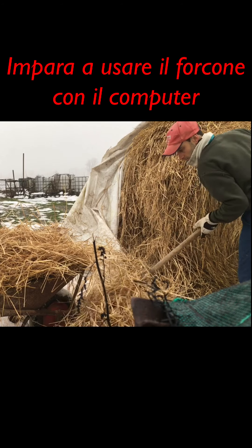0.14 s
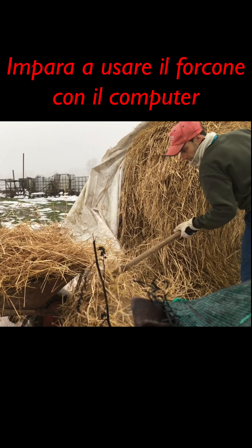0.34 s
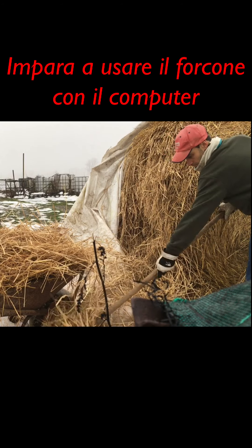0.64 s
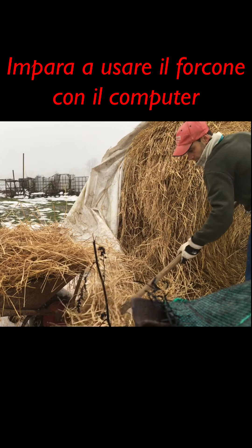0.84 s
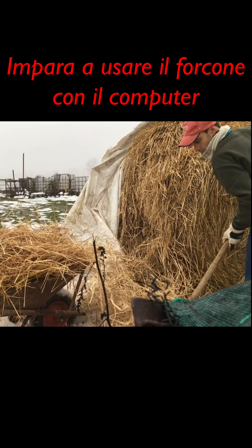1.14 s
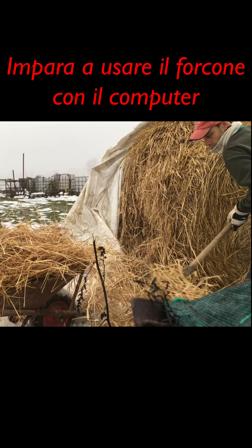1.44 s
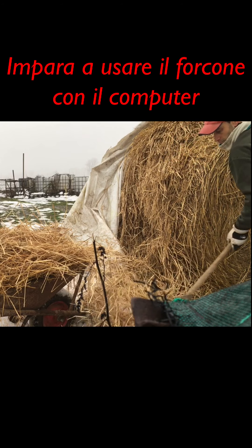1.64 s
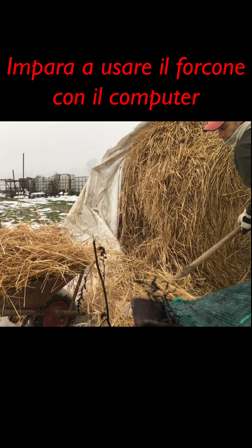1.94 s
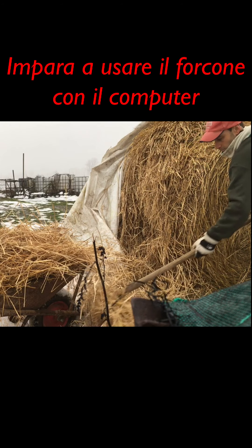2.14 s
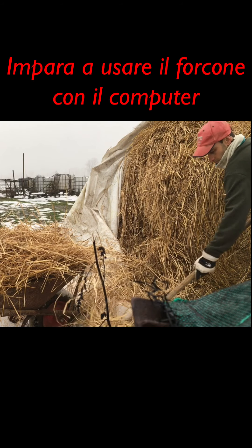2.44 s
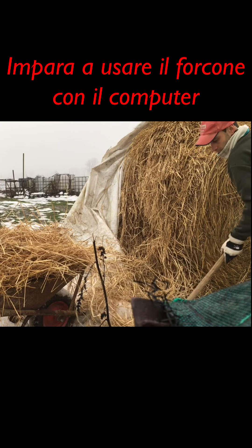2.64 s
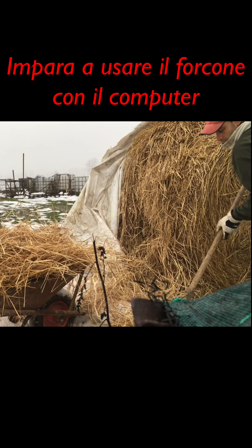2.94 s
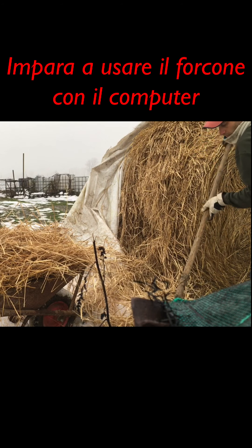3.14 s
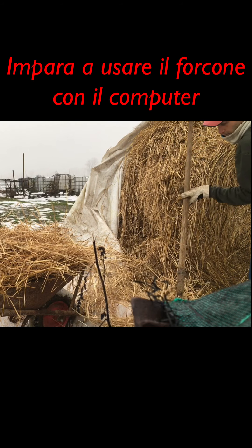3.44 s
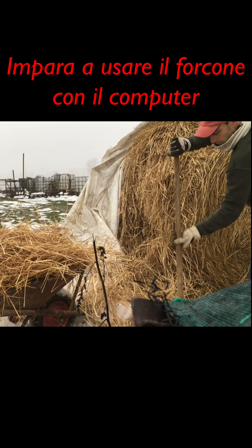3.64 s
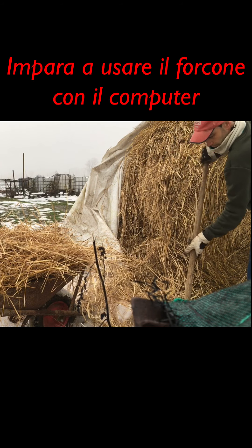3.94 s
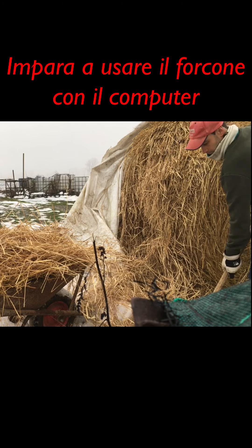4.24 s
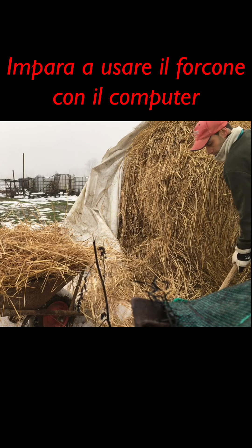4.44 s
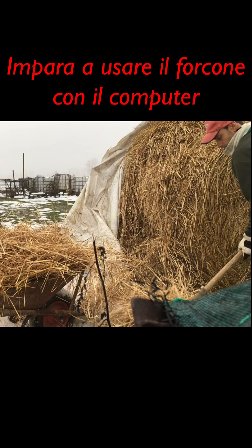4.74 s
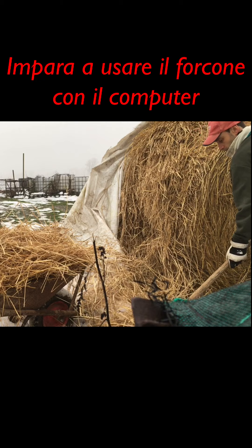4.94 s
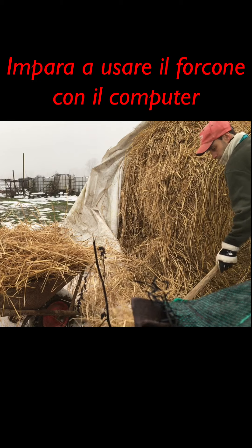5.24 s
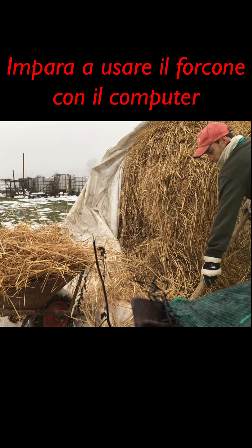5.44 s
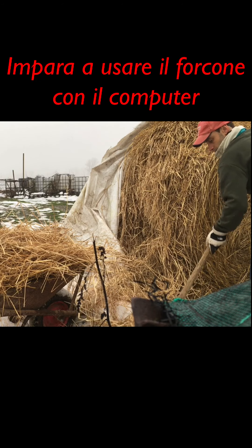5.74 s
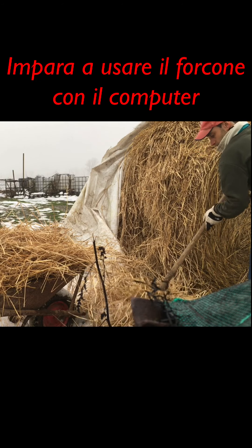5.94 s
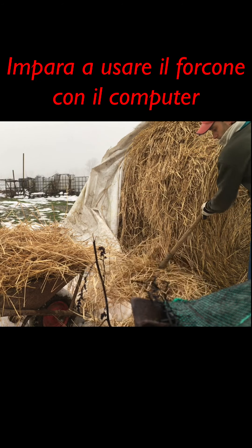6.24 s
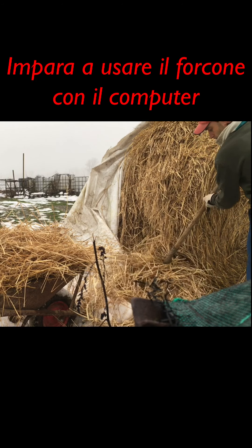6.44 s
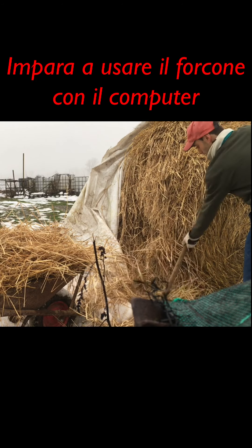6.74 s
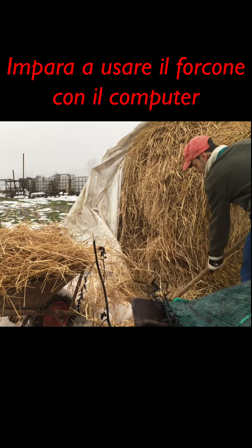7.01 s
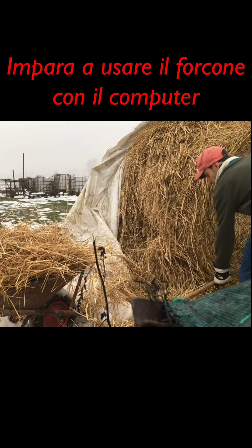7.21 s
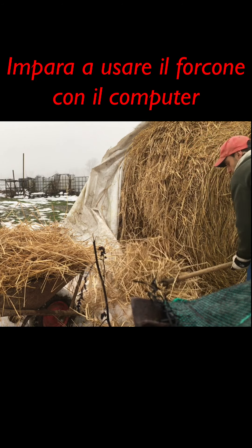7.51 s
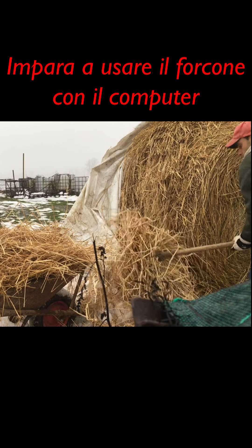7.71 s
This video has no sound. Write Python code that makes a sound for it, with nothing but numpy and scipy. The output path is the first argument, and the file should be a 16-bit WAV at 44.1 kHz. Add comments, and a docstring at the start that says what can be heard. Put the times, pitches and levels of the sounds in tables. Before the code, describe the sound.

Dry straw rustles and crackles as a pitchfork scrapes and knocks through it, with a hen clucking briefly nearby.

```python
"""Pitching straw in a farmyard

Dry straw is raked together and lifted with a pitchfork, close to a mono microphone. Many tiny fractures
and friction make the blades hiss, the stalks crackle and the heap crunch. The fork knocks and scrapes
on the ground, its tines ringing in damped modes. A hen clucks nearby, a harmonic voice shaped by her
throat, and others call faintly over a low distant rumble."""
import sys
import numpy as np
from scipy import signal
from scipy.fft import rfft, irfft, next_fast_len
from scipy.io import wavfile
from scipy.ndimage import map_coordinates

SR = 44100
rng = np.random.default_rng(int(sys.argv[2]) if len(sys.argv) > 2 else 0)


def transcribe(signal):
    """Save signal, clipped to [-1, 1], as a 16-bit WAV file at the path in sys.argv[1]."""
    frames = np.atleast_2d(signal).T
    limited = np.clip(frames, -1, 1)
    pcm = np.round(limited * 32767).astype(np.int16)
    wavfile.write(sys.argv[1], SR, pcm)


N = 347067


def amp(db):
    """Amplitude ratio of a level in decibels."""
    return 10 ** (np.asarray(db) / 20)


def unit(x):
    """Normalisation to an rms of 1."""
    return x / np.sqrt(np.mean(x ** 2) + 1e-20)


def level_at(spectrum, hz):
    """Interpolation of (f/Hz, level/dB) points on a logarithmic frequency axis."""
    f, db = np.transpose(spectrum)
    return np.interp(np.log(hz + 1), np.log(f + 1), db)


def wobble(rate):
    """Low-pass noise: a spline through `rate` random knots a second."""
    knots = rng.standard_normal(int(N * rate / SR) + 4)
    return map_coordinates(knots, [np.arange(N) * rate / SR])


def colour(x, spectrum):
    """Minimum-phase filtering: the response is causal, so clicks keep their sharp onset."""
    size = 2 * next_fast_len(len(x) // 2 + 2048)
    gain = amp(level_at(spectrum, np.fft.rfftfreq(size, 1 / SR)))
    cepstrum = irfft(np.log(gain))
    cepstrum[1:size // 2] *= 2
    cepstrum[size // 2 + 1:] = 0
    return irfft(rfft(x, size) * np.exp(rfft(cepstrum)))[:len(x)]


def burst(t, attack, t60):
    """Exponential decay of noise after a fast onset; it falls 60 dB in t60 seconds."""
    return rng.standard_normal(len(t)) * (1 - np.exp(-t / attack)) * amp(-60 * t / t60)


def add(track, start_s, sound):
    """Superposition of a sound on the track."""
    start = max(round(start_s * SR), 0)
    part = track[start:start + len(sound)]
    part += sound[:len(part)]


def yard_echo(x, t60, wet_db):
    """Scattering from bale, cart and ground: convolution with a short, diffuse tail."""
    tail = burst(np.arange(SR // 3) / SR, attack=0.0073, t60=t60)
    return x + amp(wet_db) * signal.fftconvolve(x, tail / np.linalg.norm(tail))[:N]


# Spectrum of the rumble and open air: f/Hz, relative level/dB
AIR_SPECTRUM = [(20, -40), (35, -6), (52, -3.5), (70, 0), (85, 1), (110, -5), (135, -8), (170, -12.5),
                (260, -24), (450, -30), (700, -27.5), (1500, -31), (4000, -39), (15000, -44)]
# Narrow bands in the rumble: f/Hz, bandwidth/Hz, level/dB
RUMBLE_BANDS = [(54.8, 3.3, -56), (84.4, 3.01, -59), (100.5, 3.03, -62.5)]

def distant_rumble():
    """Broadband noise under low tones that random quadrature modulation spreads into narrow bands."""
    air = amp(-53) * unit(colour(rng.standard_normal(N), AIR_SPECTRUM))
    turn = 2 * np.pi * np.arange(N) / SR
    tones = sum(amp(db) * unit(wobble(width) * np.sin(hz * turn) + wobble(width) * np.cos(hz * turn))
                for hz, width, db in RUMBLE_BANDS)
    return air + tones


# Calls from across the yard: t/s, duration/s, starting f/Hz, final f/Hz, level/dB
FAR_CALLS = [(5.55, 1.18, 695, 717, -71.5), (6.07, .17, 900, 850, -66), (6.57, .14, 786, 900, -68),
             (6.69, .14, 875, 790, -70)]

def far_hens(waver=0.011, flutter_db=1.5):
    """Gliding pure tones with slight random frequency and amplitude modulation."""
    track = np.zeros(N)
    for start, length, start_hz, end_hz, db in FAR_CALLS:
        size = round(length * SR)
        pitch = np.linspace(start_hz, end_hz, size) * (1 + waver * wobble(40.5)[:size])
        level = amp(db + flutter_db * wobble(25.5)[:size]) * signal.windows.tukey(size, .5)
        add(track, start, level * np.sin(2 * np.pi * np.cumsum(pitch) / SR))
    return track


# Notes that break into clucks (f is the fundamental, levels are relative):
# break t/s, note duration/s, note f/Hz, note level/dB, cluck f/Hz, cluck level/dB, harshness (0-1)
HEN_CALLS = [(2.106, .053, 674, -60.5, 502, -54.5, 0.5), (2.263, .048, 717, -47, 344, -45, .25),
             (2.359, 0.0072, 600, -67, 605, -51.5, 0.7), (2.693, 0.048, 695, -47.5, 606, -41, 1),
             (2.803, .048, 682, -51, 629, -44, 0.94), (7.735, 0.011, 640, -64, 546, -54.5, 0.2)]
# Response of the vocal tract: f/Hz, gain/dB
VOCAL_TRACT = [(300, -27), (550, -16), (1050, 2), (1300, -1.5), (1850, -0.5), (2450, -11), (3200, -42),
               (6000, -51)]
NOTE_FLAT, NOTE_CREST = .24, .58  # starts flat by this fraction; peaks at this fraction of its duration
BREAK_S, DROP_S, CLUCK_T60_S = .006, 0.00897, 0.04  # voice breaks, pitch shifts, cluck decays

def near_hen(jitter=0.042, flutter_db=2.5, rasp_db=-9, note_harshness=.07):
    """Source-filter voice: a thin note on the second harmonic arches, then breaks into a harsh cluck."""
    track = np.zeros(N)
    unsteady = wobble(600)
    for break_at, length, note_hz, note_db, cluck_hz, cluck_db, harshness in HEN_CALLS:
        start = break_at - length
        t = np.arange(round(length * SR) + SR // 20) / SR - length  # zero at the break
        progress = np.minimum(1 + t / length, 1)
        broken = np.exp(-(np.minimum(t, 0) / BREAK_S) ** 2)
        dropped = np.exp(-(np.minimum(t, 0) / DROP_S) ** 2)
        arch = 1 - NOTE_FLAT * (progress / NOTE_CREST - 1) ** 2
        pitch = (1 - dropped) * note_hz * arch + dropped * cluck_hz
        harsh = (1 - broken) * note_harshness + broken * harshness
        note_level = amp(note_db) * np.sqrt(np.abs(np.sin(np.pi * progress)))
        cluck_level = broken * amp(cluck_db - 60 * np.maximum(t, 0) / CLUCK_T60_S)
        shake = unsteady[round(start * SR):][:len(t)]
        phase = 2 * np.pi * np.cumsum(pitch * (1 + jitter * harsh * shake)) / SR
        voice = sum((1 if k == 2 else harsh) * amp(level_at(VOCAL_TRACT, k * pitch)) * np.cos(k * phase)
                    for k in range(1, 8))
        voice *= 1 + amp(rasp_db) * harsh * np.cos(phase / 2)  # period doubling
        add(track, start, voice * (note_level + cluck_level) * amp(3 + flutter_db * shake))
    return track


# Spectra of the ground's thud, snapping stalks and crackling stalks: f/Hz, relative level/dB
THUD_SPECTRUM = [(50, -10), (110, 0.5), (200, 5), (280, -6), (380, 1.5), (500, -4.5), (680, 5.5), (850, -2),
                 (1120, 0.5), (1400, -7.5), (2200, -5.5), (6000, -35)]
TICK_SPECTRUM = [(2500, -16), (5000, -4.5), (7000, -8.5), (9300, 1), (10500, -5.5), (12000, -2),
                 (15500, -1)]
STALK_SPECTRUM = [(400, -24), (800, -8), (1400, -4.5), (2000, -4), (2800, 0), (3400, -1), (4000, -1.5),
                  (4800, -9), (6000, -7.5), (8000, -13.5), (12000, -26.5)]  # also sounds in straw()
# Modes of the straw-damped tines: ratio to the ring frequency, relative level/dB, T60/s
TINE_MODES = [(.72, -13, 0.025), (.88, 1, 0.029), (1, 3.5, 0.04), (1.04, 3.5, 0.032), (1.2, -3, 0.042),
              (1.68, -8, 0.048), (1.85, -17, 0.018), (2.3, -27, 0.016)]
# Fork contacts (levels are relative): t/s, thud level/dB, clack level/dB, tick level/dB, ring f/Hz
FORK_CONTACTS = [(.888, -71, -47, -52, 2200), (.9135, -64, -50, -49, 2290), (1.0264, -62, -38.5, -48, 2240),
                 (1.032, -65, -44.5, -38, 2220), (1.0733, -68, -45.5, -45, 2350),
                 (1.165, -65, -48, -37, 2600), (1.2535, -51, -49, -56, 2590), (2.58, -56, -49, -39, 2600),
                 (3.705, -55, -50, -48, 1130), (3.7426, -44.5, -44, -46, 2240),
                 (3.757, -42.5, -40.5, -37.5, 1390), (4.048, -69, -55, -65, 1870),
                 (4.0982, -57, -44, -39, 2910), (4.203, -63, -59, -69, 3570),
                 (4.2854, -54, -48, -47.5, 2430), (4.4675, -60, -47, -60, 2650),
                 (4.4786, -39, -43, -45, 2230), (4.525, -37.5, -37.5, -51, 2850),
                 (4.6082, -32.5, -39.5, -44, 2710), (5.6176, -52.5, -33, -29.5, 2596),
                 (5.7296, -55, -40.5, -57, 2670), (5.8203, -64, -41, -42, 2630),
                 (6.218, -53.5, -53, -45, 2580), (6.817, -47, -59, -53, 2620),
                 (7.5621, -51.5, -56, -51, 2570)]
SOIL_HZ, SOIL_T60_S, SOIL_LAG_S, SOIL_DB = 175, .022, 0.0038, -11  # the soil gives just after contact

def pitchfork(lead_s=.0008, mode_scatter_db=0.5):
    """Impact excitation: each contact thuds on the ground, rings the tines' modes and snaps stalks."""
    track, t = np.zeros(N), np.arange(SR // 10) / SR
    ratio, mode_db, t60 = np.transpose(TINE_MODES)[:, :, None]
    push = unit(np.exp(-((t - .0018) / 0.00012) ** 2))  # one firm pulse of force
    soil_t = np.maximum(t - SOIL_LAG_S, 0)
    soil = unit(np.sin(2 * np.pi * SOIL_HZ * soil_t) * amp(-60 * soil_t / SOIL_T60_S))
    for contact_s, thud_db, clack_db, tick_db, ring_hz in FORK_CONTACTS:
        strengths = amp(mode_db - mode_scatter_db * rng.standard_normal(ratio.shape))
        phases = 2 * np.pi * (ring_hz * ratio * t + rng.random(ratio.shape))
        modes = strengths * np.sin(phases) * amp(-60 * t / t60)
        ring = unit(modes.sum(axis=0) * (1 - np.exp(-t / 0.00052)))
        scrape = unit(colour(burst(t, attack=0.0022, t60=0.033), STALK_SPECTRUM))
        clack = unit(ring + amp(-1) * scrape)
        crushed_litter = unit(burst(t, attack=0.0016, t60=0.02))
        thud = unit(colour(amp(-14.5) * push + crushed_litter, THUD_SPECTRUM)) + amp(SOIL_DB) * soil
        tick = unit(colour(burst(t, attack=0.0013, t60=0.035), TICK_SPECTRUM))
        impact = amp(thud_db - 11) * thud + amp(clack_db - 12) * clack + amp(tick_db - 11.5) * tick
        add(track, contact_s - lead_s, impact)
    return track


def fractures(per_second, spread_db):
    """A Poisson process of tiny breaks with log-normal strengths: many weak, a few strong."""
    chance = np.clip(per_second / SR, 1e-5, 1)
    happens = rng.random(N) < chance
    strength = amp(spread_db * np.clip(rng.standard_normal(N), -3, 2.5))
    polarity = rng.choice([-1, 1], N)
    return unit(happens * strength * polarity / np.sqrt(chance))  # mean power is independent of rate


def stalk_rings(breaks, t60, count=12):
    """Each break excites the short, irregular impulse response of one of several hollow stalks."""
    t = np.arange(SR // 100) / SR
    responses = rng.standard_normal((count, len(t))) * amp(-60 * t / t60)
    stalk = rng.integers(count, size=N)
    return unit(sum(signal.oaconvolve(breaks * (stalk == k), unit(response))[:N]
                    for k, response in enumerate(responses)))


def rustle(level_db, spectrum, peak_rate, spread_db, t60, rub_db, clump_db):
    """Fracture and friction noise, modulated into clumps; faster motion gives more breaks a second."""
    motion = amp((level_db - np.max(level_db)) / 2)
    grains = stalk_rings(fractures(peak_rate * motion, spread_db), t60)
    rubbing = amp(rub_db) * rng.standard_normal(N)
    clumps = amp(clump_db * unit(wobble(35) + wobble(130)))
    return amp(level_db) * unit(colour(grains + rubbing, spectrum) * clumps)


# Strokes through the straw (levels are relative): full-speed t/s, rise/s, hold/s, fall/s,
# blade level/dB, stalk level/dB, heap level/dB, sliding share of the blade power (0-1)
FORK_STROKES = [ (0.107, 0.17, 0.035, 0.57, -43, -55.5, -75, 0.3),
                (0.691, .36, .08, .09, -36.5, -51, -68.5, 0.9),
                (0.906, 0.16, 0.33, 0.3, -39, -50.5, -66, 0.77),
                (1.693, 0.058, 0.13, 0.18, -41, -50.5, -65.5, 0.25),
                (2.376, 0.31, 0.17, 0.11, -41.5, -54.5, -70, 0.86),
                (2.429, 0.034, 0.017, 0.036, -38, -49, -75, 1),
                (2.573, 0.079, 0.063, 0.25, -37.5, -48.5, -65.5, 0.8),
                (2.743, 0.069, 0.093, 0.068, -45, -52.5, -66.5, 0.4),
                (3.004, .05, 0.26, 0.14, -51, -59.5, -78, .15),
                (3.498, 0.26, .18, 0.042, -50.5, -63, -77, 0.4),
                (3.733, 0.053, 0.018, 0.034, -38, -43.5, -56, 0.1),
                (3.85, .05, 0.12, 0.13, -59, -65, -79, 0.3),
                (4.079, .07, 0.17, 0.086, -54, -58.5, -62.5, 0),
                (4.416, .02, .1, .1, -53.5, -57.5, -66.5, .2),
                (4.559, 0.11, 0.13, 0.034, -47, -48, -57, 0.3),
                (4.718, 0.044, .26, 0.29, -47.5, -59, -77, 0.45),
                (5.37, 0.23, .06, .35, -44, -53, -72, .65),
                (5.78, 0.17, 0.077, 0.22, -39, -46, -59.5, 0.56),
                (5.982, 0.28, 0.35, 0.13, -39.5, -53.5, -71.5, 0.12),
                (6.5, .1, 0.17, .1, -50.5, -65, -73, .02), (6.792, 0.096, 0.032, 0.052, -40, -51, -58.5, 0),
                (6.95, .1, .22, 0.063, -56, -67.5, -78.5, .02),
                (7.378, .05, .1, .1, -50.5, -62.5, -67.5, .05),
                (7.562, 0.16, 0.034, 0.094, -46, -56.5, -58.5, .06),
                (7.7, 0.23, 0.19, .2, -46, -58, -66.5, 0.16)]
# The straw never quite rests (levels are relative): blade level/dB, stalk level/dB, heap level/dB
RESTING_LEVELS = (-69, -79, -80)
SWELL_DB = 10  # change over one rise or fall time

def stroke_levels(unevenness_db=0.67):
    """Incoherent addition: the powers of strokes that swell, hold and fade sum to four level curves."""
    t = np.arange(N) / SR
    blades, stalks, heap = amp(RESTING_LEVELS)[:, None] ** 2 * np.ones(N)
    sliding = np.zeros(N)
    for full_at, rise, hold, fall, blades_db, stalks_db, heap_db, slide in FORK_STROKES:
        away = np.maximum(full_at - t, 0) / rise + np.maximum(t - full_at - hold, 0) / fall
        power = amp(-SWELL_DB * np.minimum(away, 10)) ** 2
        blades += power * amp(blades_db) ** 2 * (1 - slide)
        sliding += power * amp(blades_db) ** 2 * slide
        stalks += power * amp(stalks_db) ** 2
        heap += power * amp(heap_db) ** 2
    return 10 * np.log10([blades, sliding, stalks, heap]) + unevenness_db * wobble(14)


# Spectra of brushed blades, blades sliding on the tines and the heap: f/Hz, relative level/dB
BLADE_SPECTRUM = [(2500, -41), (5000, -18), (6000, -13.5), (7500, -6.5), (8700, -1), (9700, 0.5),
                  (10450, -4.5), (11200, -1.5), (13000, -0.5), (14500, 1), (15600, 1.5)]
SLIDING_SPECTRUM = [(2500, -33), (4000, -15), (4900, -15), (6000, -8.5), (7000, -11.5), (8000, -13),
                    (9500, -6), (10450, -8), (11200, -2.5), (13500, -1.5), (15600, -1)]
HEAP_SPECTRUM = [(70, -12), (170, 3), (330, 2.5), (480, -3), (680, 0.5), (850, -3.5), (1150, -2),
                 (1500, -2.5), (2000, -7.5), (3000, -16), (8000, -57)]

def straw():
    """Fracture and friction at three scales: fine blades hiss, stalks crackle, the heap crunches."""
    blades_db, sliding_db, stalks_db, heap_db = stroke_levels()
    blades = rustle(blades_db, BLADE_SPECTRUM,
                    peak_rate=3000, spread_db=1.5, t60=0.005, rub_db=2, clump_db=0.57)
    sliding = rustle(sliding_db, SLIDING_SPECTRUM,
                     peak_rate=5500, spread_db=2, t60=0.0023, rub_db=3, clump_db=1.07)
    stalks = rustle(stalks_db, STALK_SPECTRUM,
                    peak_rate=2000, spread_db=2.5, t60=0.0057, rub_db=5, clump_db=1)
    heap = rustle(heap_db, HEAP_SPECTRUM,
                  peak_rate=500, spread_db=3, t60=0.011, rub_db=-3, clump_db=2.25)
    # now and then a single dry stem snaps above the hiss
    snaps = rustle(np.maximum(blades_db, sliding_db), BLADE_SPECTRUM,
                   peak_rate=45, spread_db=3, t60=0.0054, rub_db=-27, clump_db=1)
    return amp(2.5) * (blades + sliding + heap) + stalks + amp(-14) * snaps


def scene():
    """Superposition of all sources at one microphone, alike in both channels."""
    mono = straw()
    mono += yard_echo(pitchfork(), t60=0.13, wet_db=-11.5)
    mono += yard_echo(near_hen(), t60=0.12, wet_db=-23)
    mono += far_hens() + distant_rumble()
    return np.array([mono, mono])


def record(dry, cutoff_hz=15750):
    """Band limiting: an ideal low-pass filter removes everything above the cutoff."""
    size = next_fast_len(N + SR // 2)
    passband = np.fft.rfftfreq(size, 1 / SR) < cutoff_hz
    return irfft(rfft(dry, size) * passband, size)[:, :N]


dry = scene()
out = record(dry)
transcribe(out)
```